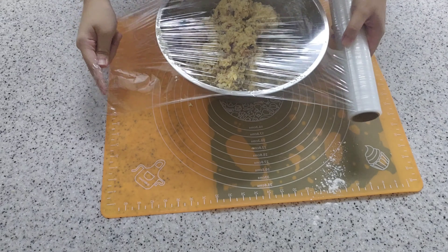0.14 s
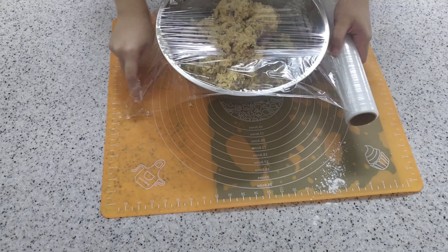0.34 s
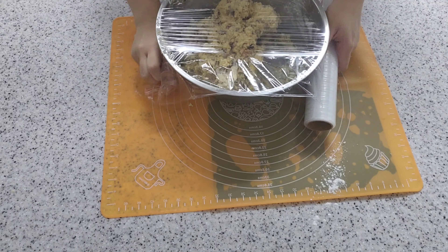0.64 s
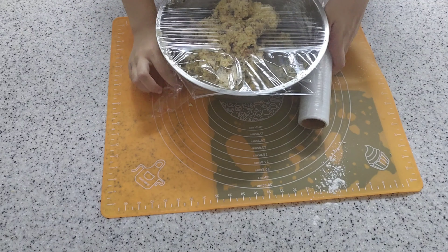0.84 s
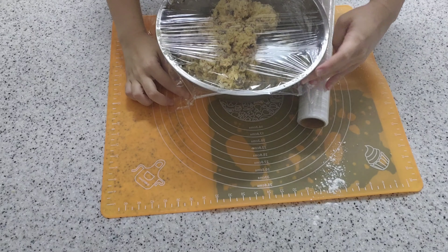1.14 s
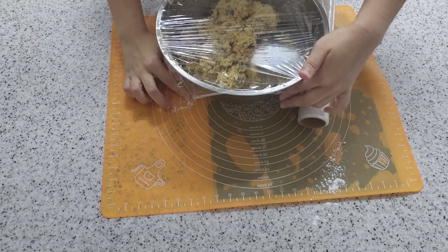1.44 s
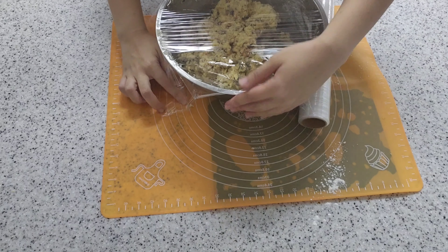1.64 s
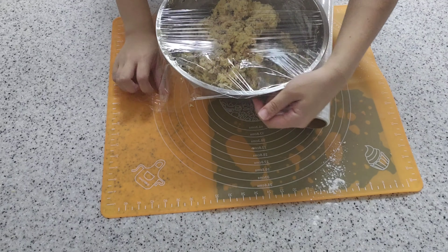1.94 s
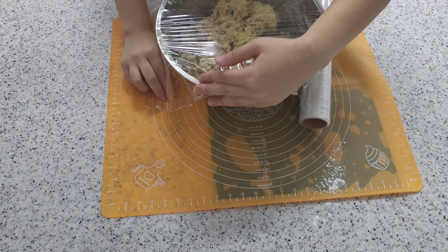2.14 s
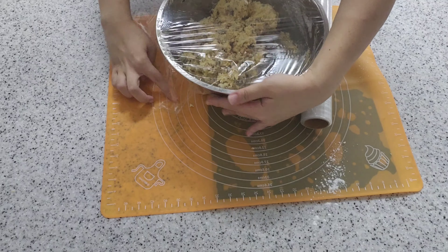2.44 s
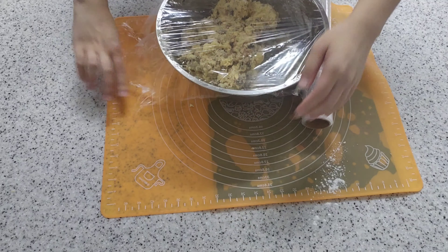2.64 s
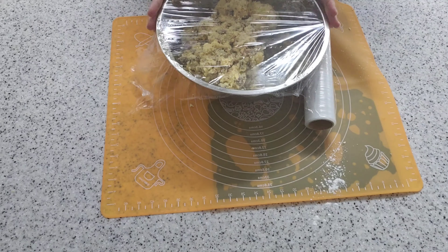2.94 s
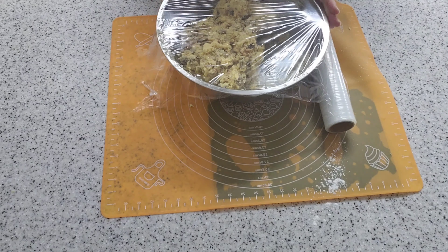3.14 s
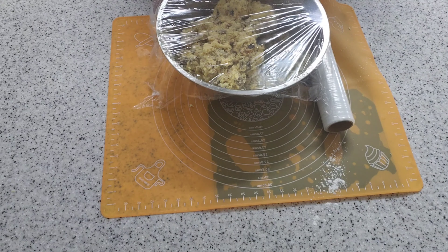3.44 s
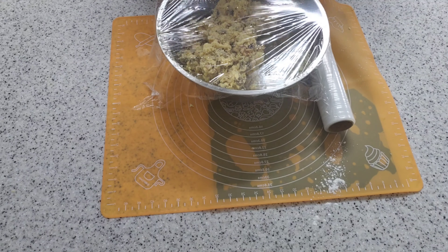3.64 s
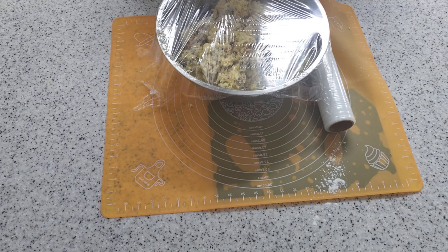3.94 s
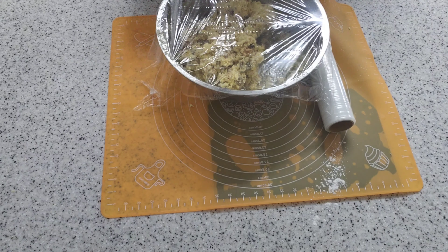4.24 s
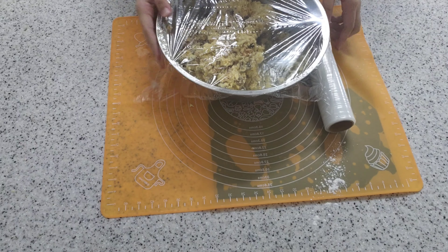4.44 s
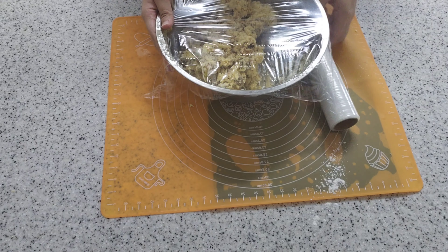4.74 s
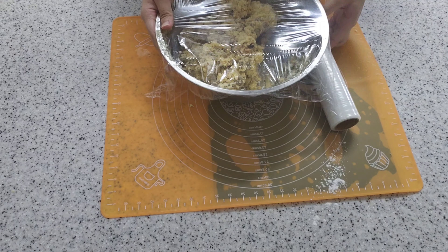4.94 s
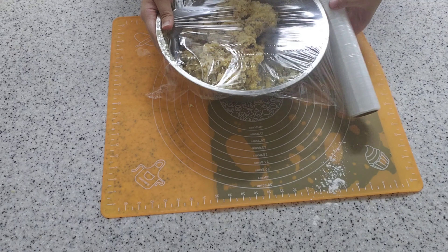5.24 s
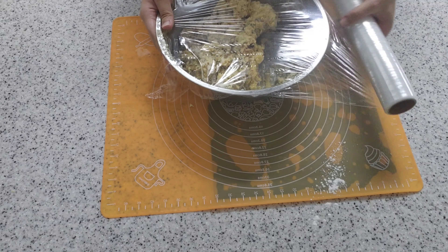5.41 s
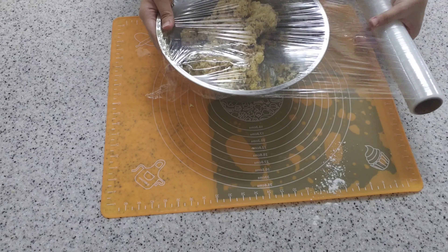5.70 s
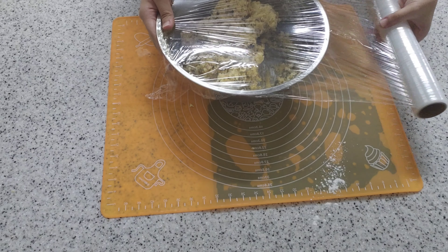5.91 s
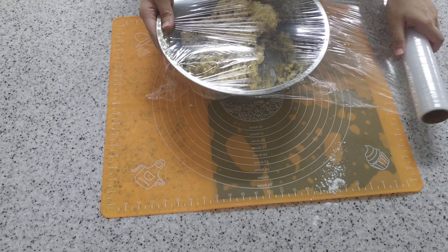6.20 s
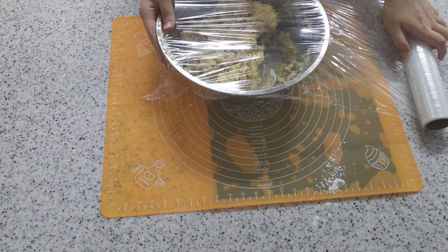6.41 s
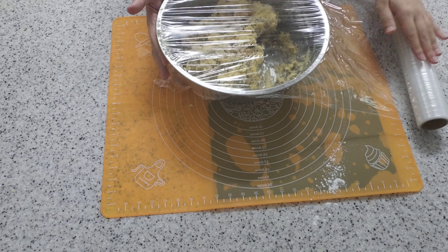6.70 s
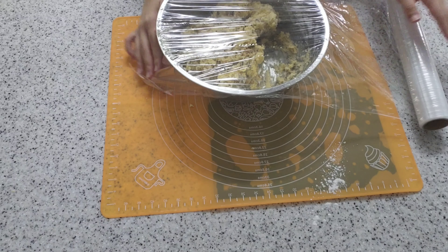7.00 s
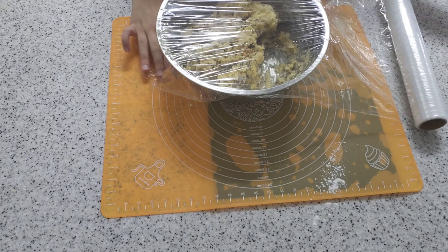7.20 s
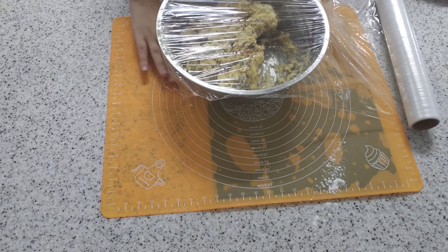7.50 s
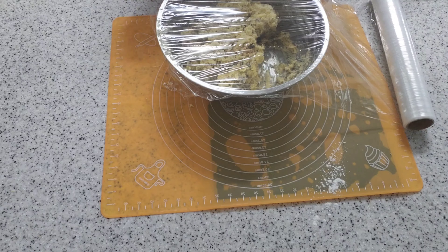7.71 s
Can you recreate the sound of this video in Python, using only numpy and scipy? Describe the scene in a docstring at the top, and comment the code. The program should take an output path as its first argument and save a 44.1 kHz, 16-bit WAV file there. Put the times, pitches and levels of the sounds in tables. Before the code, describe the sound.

Plastic cling film crackles and snaps as it is smoothed over a metal bowl, then squeals briefly as more peels off the roll.

```python
"""A low rumble comes first: hands shift a steel bowl on a mat in a quiet kitchen where an appliance hums.
Cling film is smoothed over the bowl. Its creases buckle in swarms of tiny clicks, it whistles on the rim,
and it snaps and pops loose. Bowl and roll bump on the worktop and ring in damped modes.
Stick-slip friction makes the film squeal as more peels off the roll, and chirp under the fingers."""
import sys
import numpy as np
from scipy import signal
from scipy.fft import rfft, irfft
from scipy.io import wavfile
from scipy.ndimage import uniform_filter1d

SR = 44100
rng = np.random.default_rng(int(sys.argv[2]) if len(sys.argv) > 2 else 0)


def wav_record(signal):
    """Record a signal, one row per channel, as 16-bit PCM in the file named by sys.argv[1]."""
    frames = np.transpose(np.atleast_2d(signal))
    bounded = np.clip(frames, -1, 1)
    # unit amplitude maps onto the largest positive 16-bit level
    quanta = np.round(bounded * 32767).astype(np.int16)
    wavfile.write(sys.argv[1], SR, quanta)


N = 346533
TIME = np.arange(N) / SR


def from_db(db):
    """Amplitude ratio of a level in decibels."""
    return 10 ** (np.asarray(db) / 20)


def rms_one(x):
    """Normalisation to unit mean power."""
    return x / np.sqrt(np.mean(x ** 2) + 1e-20)


def in_time(rows):
    """Linear interpolation of (time, value) rows at every sample."""
    return np.interp(TIME, *np.transpose(rows))


def drift(rate):
    """Random modulation of rms 1, with `rate` new values a second."""
    steps = rng.standard_normal(N // 20)
    return rms_one(np.interp(TIME * rate, np.arange(len(steps)), steps))


def convolve(x, response):
    """Linear filtering of a mono or stereo sound by an impulse response."""
    return signal.oaconvolve(np.atleast_2d(x), np.atleast_2d(response), axes=1)[:, :N]


def colour(spectrum, size=4096):
    """Minimum-phase response of unit energy, from (frequency, level) rows."""
    hz, db = np.transpose(spectrum)
    log_bins = np.log(np.maximum(np.fft.rfftfreq(size, 1 / SR), 1))
    gains = from_db(np.interp(log_bins, np.log(hz), db))
    cepstrum = irfft(np.log(gains))
    cepstrum[1:size // 2] *= 2   # folding the cepstrum makes the response causal
    cepstrum[size // 2 + 1:] = 0
    response = irfft(np.exp(rfft(cepstrum)))
    return response / np.linalg.norm(response)


def resonance(x, hz, width_hz):
    """Two-pole resonator with unit peak gain."""
    r = np.exp(-np.pi * width_hz / SR)
    feedback = [1, -2 * r * np.cos(2 * np.pi * hz / SR), r * r]
    return signal.lfilter(np.array([1, 0, -1]) * (1 - r * r) / 2, feedback, x + 1e-18)


def dull(x, hz):
    """One-pole low-pass filter."""
    r = np.exp(-2 * np.pi * hz / SR)
    return signal.lfilter([1 - r], [1, -r], x)


def shelf(x, hz, gain_db):
    """A fourth-order crossover gives the band above hz its own gain."""
    sections = (signal.butter(2, hz, kind, fs=SR, output="sos") for kind in ("low", "high"))
    low, high = (signal.sosfilt(np.tile(sos, (2, 1)), x) for sos in sections)
    return low + from_db(gain_db) * high


def diffuse_field(size, alike_below_hz):
    """Diffuse noise is coherent at the two ears only at long wavelengths."""
    mid, side = rng.standard_normal((2, size))
    side = signal.sosfilt(signal.butter(1, alike_below_hz, "high", fs=SR, output="sos"), side)
    return np.array([mid + side, mid - side])


def coloured_noise(spectrum):
    """Spectral shaping of a diffuse field, at rms 1."""
    return rms_one(convolve(diffuse_field(N, alike_below_hz=730), colour(spectrum)))


# Kitchen reverberation: (early T60 [s], tail level [dB], tail T60 [s], wall cutoff [Hz])
ROOM = {"early_s": 0.084, "tail_db": -6.5, "tail_s": 0.17, "wall_hz": 8500}
def room_response(wet_db, size=12000):
    """Reflection: direct sound, echoes off bowl and worktop, then a tail dulled by wall absorption."""
    t = np.arange(size) / SR
    direct = np.arange(size) == rng.integers(0, 7, (2, 1))   # each ear has its own delay
    echoes = diffuse_field(size, alike_below_hz=360)
    early = echoes * from_db(-60 * t / ROOM["early_s"]) * (t > .0005)
    tail = dull(echoes[:, ::-1], ROOM["wall_hz"]) * from_db(-60 * t / ROOM["tail_s"]) * (t > .008)
    reflections = rms_one(early) + from_db(ROOM["tail_db"]) * rms_one(tail)
    return direct + from_db(wet_db) * reflections / np.sqrt(size)


def add(out, start_s, sound, wet_db):
    """Superposition: a short sound joins the mix from its own spot in the room."""
    heard = signal.fftconvolve(sound[None], room_response(wet_db), axes=1)
    at = int(start_s * SR)
    out[:, at:at + heard.shape[1]] += heard[:, :N - at]


# Spectrum of the bowl shifting on the mat: (frequency [Hz], relative level [dB])
RUMBLE_SPECTRUM = [(22, -8), (48, -12), (70, -1), (110, -13.5), (500, -25.5), (2500, -63.5)]
# Envelope of that rumble: (time [s], level [dB])
RUMBLE_ENVELOPE = [(0, -51.5), (1.33, -45.5), (1.55, -52), (2.5, -53), (2.85, -62.5), (3.17, -49.5),
                   (3.5, -59), (5.65, -56), (7.86, -60.5)]
def bowl_rumble():
    """Amplitude modulation: low noise swells in irregular lumps as hands shift the bowl."""
    lumps_db = 4 * drift(8.3)
    return from_db(in_time(RUMBLE_ENVELOPE) + lumps_db) * coloured_noise(RUMBLE_SPECTRUM)


# Bands of the appliance hum: (frequency [Hz], resonator bandwidth [Hz], level [dB])
HUM_BANDS = [(77.4, 7.7, -56), (362.5, 21.4, -63.5), (7030, 89, -84.5)]
def appliance_hum():
    """Narrow-band noise is heard as a wavering tone."""
    noise = diffuse_field(N, alike_below_hz=500)
    return sum(from_db(db) * rms_one(resonance(resonance(noise, hz, width), hz, width))
               for hz, width, db in HUM_BANDS)


# Spectrum of the room air: (frequency [Hz], relative level [dB])
AIR_SPECTRUM = [(20, -10.5), (50, 1.5), (100, -7), (170, -15.5), (400, -12), (730, -24), (2140, -41),
                (3420, -52.5), (6440, -38), (10600, -47), (14300, -40), (16000, -62)]
def room_air():
    """Ambient noise forms a steady diffuse field."""
    return from_db(-55) * coloured_noise(AIR_SPECTRUM)


# Faint rustle of the film settling between strokes: (time [s], level [dB])
SETTLING_ENVELOPE = [(0, -66), (.3, -54.5), (1.52, -58.5), (1.9, -55.5), (2.1, -58.5), (2.7, -57.5),
                     (2.85, -79), (3.35, -63.5), (3.92, -64.5), (4.06, -51.5), (4.24, -74.5), (6.15, -58.5),
                     (6.38, -49), (6.67, -62), (6.95, -55.5), (7.45, -54), (7.86, -66.5)]
# Hands pressing, smoothing or pulling: (time [s], duration [s], level [dB], drumming [dB], sheen [dB])
HAND_STROKES = [(0.433, 0.055, -44, -7.5, -4), (0.658, 0.034, -49, -4, -5), (0.76, 0.017, -46, -2, -10),
                (0.823, 0.35, -49, -9, 2), (1.13, 0.094, -37.5, -12, -4), (1.315, 0.087, -39, -14, 0.5),
                (1.562, 0.027, -47, -6.5, -2), (1.888, 0.018, -46, -10.5, -3),
                (2.154, 0.18, -46, -11.5, -3), (2.436, .13, -46.5, -11, -3), (3.006, 0.19, -42.5, -10, -2),
                (3.255, 0.025, -35, -12.5, 0.5), (3.58, .178, -53, -8, 1), (4.085, 0.042, -38.5, -11, -7.5),
                (4.514, 0.15, -51.5, -5, -6), (5.109, 0.051, -48.5, -10, -3), (5.278, 0.05, -37, -9, -2),
                (5.391, .14, -38.5, -7, -1.5), (5.586, 0.017, -19, -18, -2.5),
                (5.911, 0.011, -49, -17.5, 2), (6.025, 0.051, -36.5, -4, 0.5),
                (6.187, 0.028, -43.5, -4, 0.5), (6.277, 0.035, -34.5, -10, -5),
                (6.567, 0.011, -40, -13, -6.5), (6.753, 0.11, -39, -16.5, -2),
                (7.067, .144, -46.5, -18, -1.5)]
def handwork():
    """Incoherent sources add in power; drumming and sheen are power-weighted means. All three in dB."""
    grip_db_per_s, swell_db, release_db_per_s = 890, 5.5, 331.5
    settling_drum_db, settling_sheen_db = -7, -0.5
    power = from_db(in_time(SETTLING_ENVELOPE)) ** 2
    drum, sheen = power * settling_drum_db, power * settling_sheen_db
    for start, length, db, drum_db, sheen_db in HAND_STROKES:
        span = slice(max(int((start - .1) * SR), 0), int((start + length + .25) * SR))
        t = TIME[span] - start
        grip = grip_db_per_s * np.minimum(t, 0)
        tightening = -swell_db * np.clip(1 - t / length, 0, 1)
        release = -release_db_per_s * np.maximum(t - length, 0)
        stroke = from_db(db + grip + tightening + release) ** 2
        power[span] += stroke
        drum[span] += stroke * drum_db
        sheen[span] += stroke * sheen_db
    return 10 * np.log10(power), drum / power, sheen / power


def buckling_clicks(level_db):
    """A Poisson process: creases buckle in clumps, more often as the film is worked harder."""
    effort_db = .62 * (level_db - level_db.mean())
    clumps_db = 5.5 * drift(110)
    clicks_per_s = 600 * from_db(effort_db + clumps_db)
    # most clicks are tiny, a few stand well out
    sizes = from_db(5 * np.minimum(rng.exponential(1, N), 4)) * rng.choice([-1, 1], N)
    clicks = sizes * (rng.random(N) < clicks_per_s / SR)
    # the clicks share out the energy that the hands put in
    window = 0.025 * SR
    power = uniform_filter1d(uniform_filter1d(clicks ** 2, int(window)), int(window / 2))
    return clicks * from_db(level_db) / np.sqrt(np.abs(power) + 1e-4)


def facets(clicks, count=9):
    """Resonance: facets of different sizes ring at different pitches, taking turns as the film shifts."""
    turns = np.array([drift(25) for _ in range(count)])
    active_facet = np.argmax(turns + rng.standard_normal((count, N)), axis=0)
    out = 0
    for k, hz in enumerate(np.geomspace(1800, 15000, count)):
        own = clicks * (active_facet == k)
        ring = from_db(-5) * resonance(own, hz, width_hz=hz * 0.12)
        out = out + convolve(own + ring, room_response(wet_db=4.5))
    return out


# Bright spectrum of the creases: (frequency [Hz], relative level [dB])
CREASE_SPECTRUM = [(700, -14), (1500, -4), (3600, -3), (5000, 0.5), (6500, 3.5), (8200, 0.5), (10600, -2),
                   (12500, 4), (14500, 7.5), (16000, -2)]
# Drumming spectrum of the taut sheet: (frequency [Hz], relative level [dB])
SHEET_SPECTRUM = [(200, -16), (450, 8.5), (1100, 5.5), (1600, 2.5), (2400, -3.5), (6000, -12.5)]
def film_radiation(clicks, drum_db, crease_db, sheet_db):
    """Clicks radiate by two paths: brightly from the creases and, lower, from the taut sheet."""
    creases = from_db(crease_db) * convolve(clicks, colour(CREASE_SPECTRUM))
    sheet = from_db(sheet_db) * convolve(clicks * from_db(drum_db), colour(SHEET_SPECTRUM))
    return creases + sheet


def crackle():
    """Buckling turns the work of the hands into clicks; the finest creases give the sheen on top."""
    level_db, drum_db, sheen_db = handwork()
    clicks = facets(buckling_clicks(level_db))
    swarm = film_radiation(clicks, drum_db, crease_db=-6, sheet_db=-7)
    return shelf(swarm, hz=10000, gain_db=sheen_db)


def stick_slip(rows, jitter_hz, jitter_rate, rough_db, wet_db, harmonics=1, overtone_db=0):
    """Stick-slip oscillation: film grips and slips at a gliding, unsteady rate; each harmonic flutters."""
    out, jitter = np.zeros((2, N)), jitter_hz * drift(jitter_rate)
    gains = [from_db(overtone_db * k + rough_db * drift(450)) for k in range(harmonics)]
    for start, length, start_hz, end_hz, db in rows:
        progress = np.linspace(0, 1, int(length * SR))
        span = slice(int(start * SR), int(start * SR) + len(progress))
        hz = start_hz + (end_hz - start_hz) * progress + jitter[span]
        phase = 2 * np.pi * np.cumsum(hz) / SR
        tone = sum(gains[k][span] * np.sin((k + 1) * phase)
                   for k in range(harmonics) if (k + 1) * start_hz < SR / 2)
        arch = 2 * np.sqrt(progress * (1 - progress))
        add(out, start, from_db(db) * tone * arch, wet_db)
    return out


# Film sliding on the rim: (time [s], duration [s], start pitch [Hz], end pitch [Hz], level [dB])
RIM_SLIDES = [(.1, 0.13, 13770, 14400, -62), (2.115, 0.091, 13700, 14000, -57)]
def whistles():
    """Stick-slip on the rim sounds a single thin, high partial."""
    return stick_slip(RIM_SLIDES, jitter_hz=70, jitter_rate=45, rough_db=2, wet_db=-6)


# Single creases snapping loose: (time [s], relative level [dB], drumming [dB])
CREASE_SNAPS = [(0.3083, -32.5, 2), (.614, -41, -22), (.677, -34, -17), (0.753, -33, -12),
                (1.0225, -28, -13), (1.112, -33.5, -12), (1.129, -30.5, -14), (1.162, -25.5, -4),
                (1.1947, -26.5, -12), (1.4525, -28, -3), (2.0276, -29.5, -6), (2.335, -30.5, -17),
                (2.734, -40, -14), (3.049, -25, -8), (3.1181, -20.5, -24), (3.7563, -32, -14),
                (4.8343, -34, 6), (5.15, -34.5, -6), (5.3378, -27.5, 2.5), (5.458, -24.5, 1.5),
                (5.772, -35.5, -10), (5.851, -35.5, -20), (6.967, -37.5, -6), (7.768, -40.5, -17)]
def snaps(flutter_t60_s=0.018):
    """Snap-through: a big crease lets go in one impulse and leaves the film fluttering."""
    out, t = np.zeros((2, N)), np.arange(SR // 20) / SR
    impulse = t == 0
    for start, db, _ in CREASE_SNAPS:
        flutter = rng.standard_normal(len(t)) * from_db(-60 * t / flutter_t60_s)
        snap = impulse + 1.19 * flutter / np.linalg.norm(flutter)
        add(out, start, from_db(db) * snap, wet_db=0)
    drum_db = in_time([(start, drum) for start, _, drum in CREASE_SNAPS])
    return film_radiation(dull(out, hz=8500), drum_db, crease_db=12, sheet_db=7)


# Modes that a bump excites: (frequency [Hz], relative level [dB])
BODY_MODES = [(122.7, 5), (177, 1), (222.4, 1), (266, -6.5), (364, -2), (505, 1), (798, -7), (1150, -27)]
# Bowl and roll bumped and tapped: (time [s], level over the first 20 ms [dB], contact pitch [Hz])
CONTACTS = [(.495, -48, 130), (1.169, -45.5, 700), (1.214, -45.5, 167), (1.251, -44.5, 205),
            (2.539, -45.5, 238), (4.837, -37, 165), (5.149, -43.5, 367), (5.338, -42, 860),
            (6.346, -38, 225), (6.436, -32.5, 294)]
def bumps(lowest_t60_s=0.11, falloff_db_per_octave=10):
    """Modal excitation: each contact rings the modes nearest its pitch and gives a short, dull knock."""
    out, t = np.zeros((2, N)), np.arange(SR // 2) / SR
    hz, mode_db = np.transpose(BODY_MODES)[:, :, None]
    decays = from_db(-60 * t / lowest_t60_s * np.sqrt(hz / hz[0]))   # higher modes die sooner
    for start, db, pitch_hz in CONTACTS:
        gains = from_db(mode_db - falloff_db_per_octave * np.abs(np.log2(hz / pitch_hz)))
        signs = rng.choice([-1, 1], hz.shape)
        ring = np.sum(gains * signs * np.sin(2 * np.pi * hz * t) * decays, axis=0)
        burst = dull(rng.standard_normal(len(t)), pitch_hz * 2) * from_db(-60 * t / 0.09)
        knock = resonance(burst, pitch_hz * 1.3, width_hz=pitch_hz)
        cushion = 1 - np.exp(-t * pitch_hz)   # the mat spreads the onset over about a cycle
        hit = (rms_one(ring) + from_db(-4.5) * rms_one(knock)) * cushion
        add(out, start, from_db(db) * hit / hit[t < .02].std(), wet_db=-5)
    return out


# Small patches of taut film popping free: (time [s], level [dB], frequency [Hz])
PATCH_POPS = [(1.252, -27, 6050), (1.524, -40, 5950), (1.675, -33, 6040), (1.8245, -39.5, 5800),
              (1.94, -31, 5880), (3.118, -37.5, 588), (3.172, -22, 8170), (3.978, -41.5, 6020),
              (4.031, -33, 6220), (4.096, -46, 1090), (4.491, -52.5, 1220), (4.58, -45.5, 1270),
              (4.648, -49, 6170), (4.8357, -22.5, 6080)]
def ticks(rise_cycles=1.7):
    """Damped oscillation: a freed patch swells quickly and rings for a few cycles at its own pitch."""
    out, t = np.zeros((2, N)), np.arange(SR // 20) / SR
    for start, db, hz in PATCH_POPS:
        age = t * hz / rise_cycles
        envelope = age * np.exp(1 - age)
        add(out, start, from_db(db) * envelope * np.sin(2 * np.pi * hz * t), wet_db=-3)
    return out


# Pulls on the film: (time [s], duration [s], start pitch [Hz], end pitch [Hz], level [dB])
FILM_PULLS = [(3.131, 0.025, 1510, 1490, -48.5), (5.572, 0.015, 1280, 1240, -32.5),
              (5.591, 0.0095, 1154, 1200, -25), (5.605, 0.015, 1047, 910, -25),
              (5.611, 0.042, 1798, 1394, -35), (5.619, 0.025, 779, 892, -30),
              (5.646, 0.01706, 852, 130, -31.5), (6.044, 0.015, 1494, 1360, -37),
              (6.045, 0.011, 736, 696, -34.5), (6.084, 0.028, 944, 820, -38.5),
              (6.216, 0.019, 523, 550, -41.5), (6.286, 0.04, 863, 494, -41)]
def squeals():
    """Stick-slip gives rough midrange tones as the film is drawn tight or peels off the roll."""
    return stick_slip(FILM_PULLS, jitter_hz=79, jitter_rate=1100, rough_db=3, wet_db=-3.5,
                      harmonics=3, overtone_db=-8.5)


# Fingers rubbing the film: (time [s], duration [s], start pitch [Hz], end pitch [Hz], level [dB])
FINGER_RUBS = [(6.84, 0.015, 5560, 5060, -33), (6.85, 0.021, 6000, 4660, -32.5)]
def chirps():
    """Rapid stick-slip under the fingers gives brief, high, falling tones."""
    return stick_slip(FINGER_RUBS, jitter_hz=280, jitter_rate=2500, rough_db=2.5, wet_db=-1.5,
                      harmonics=2, overtone_db=-8)


def scene():
    """The sources superpose; an interaural level difference sets the bright ones a little to the left."""
    leftward = from_db([[1], [-1]])
    bright = crackle() + whistles() + snaps() + ticks() + chirps()
    return bowl_rumble() + appliance_hum() + room_air() + leftward * bright + bumps() + squeals()


def record(dry):
    """Band limiting: a steep elliptic low-pass cuts the top at 16 kHz."""
    return signal.sosfilt(signal.ellip(12, .2, 80, 16000, fs=SR, output="sos"), dry)


dry = scene()
out = record(dry)
wav_record(out)
```